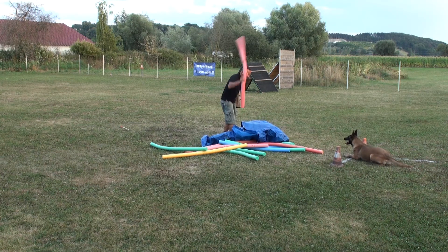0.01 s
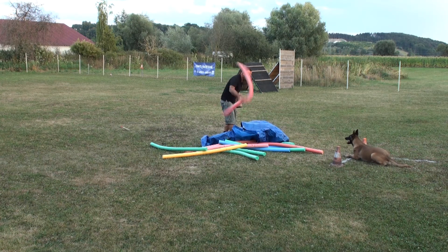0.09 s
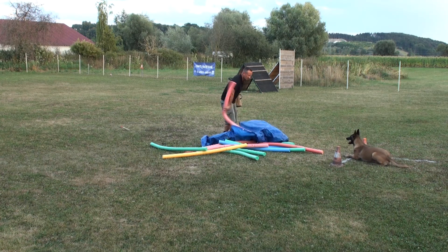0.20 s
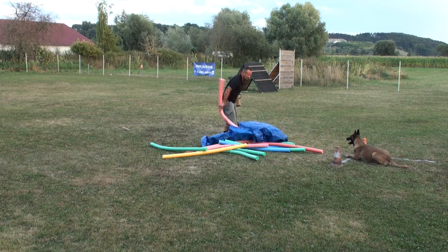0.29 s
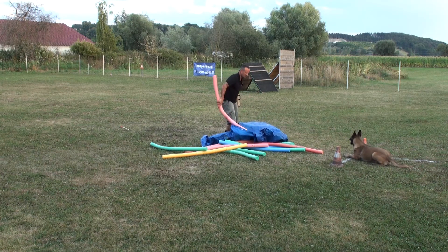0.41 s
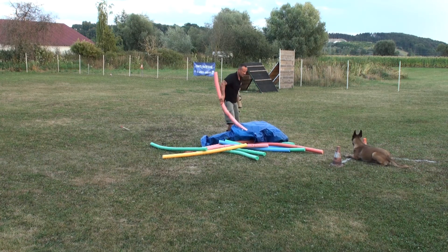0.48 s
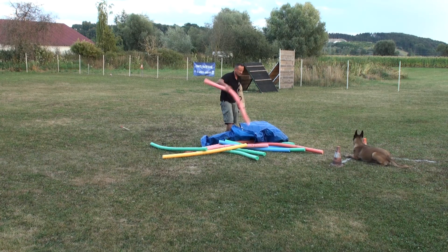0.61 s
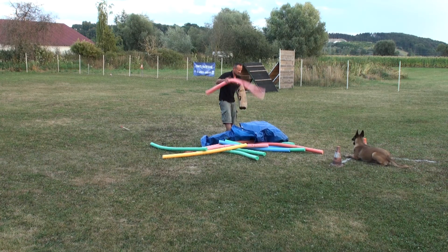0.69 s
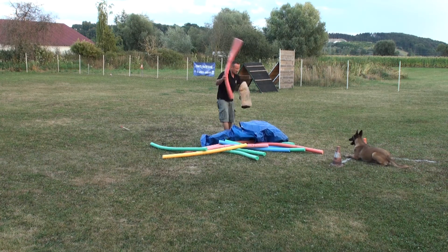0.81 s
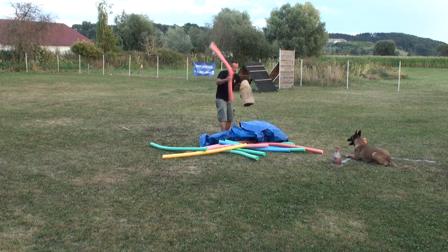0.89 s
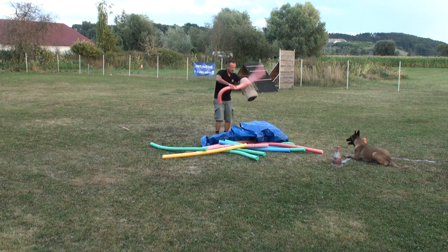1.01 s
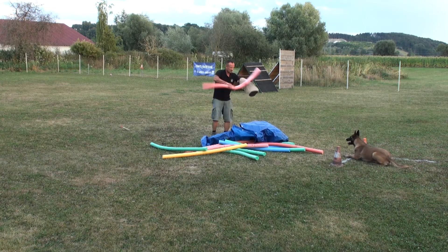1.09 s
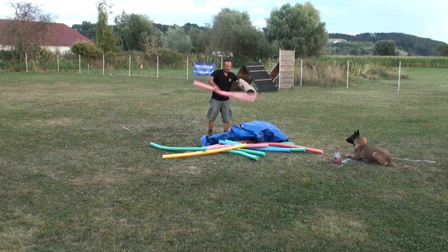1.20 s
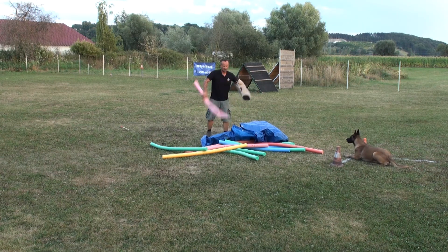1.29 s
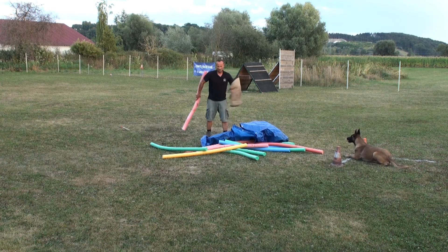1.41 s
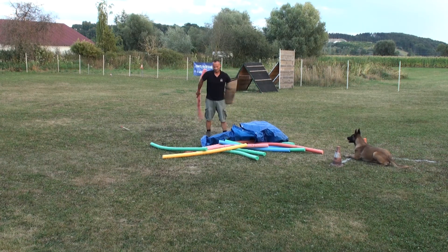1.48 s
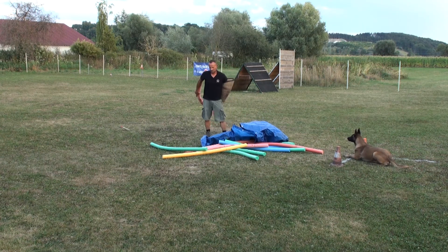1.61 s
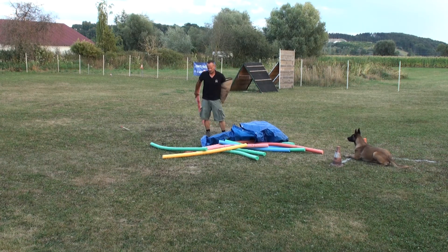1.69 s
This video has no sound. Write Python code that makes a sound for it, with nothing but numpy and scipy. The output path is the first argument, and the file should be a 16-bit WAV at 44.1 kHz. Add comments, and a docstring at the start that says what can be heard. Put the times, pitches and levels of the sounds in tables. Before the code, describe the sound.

A foam pool noodle slaps sharply onto a plastic tarp outdoors, then a softer hollow knock follows

```python
"""The open-air hush is heard first; then a foam noodle swishes and slaps a plastic tarp on a grass field.
The slap is a burst of tiny snaps, a low thump and a dying crinkle. Later the noodle knocks softly
against a padded sleeve: a falling pop, ringing noise and a rub. Ticks and taps are short noise and
tones, a far bird is gliding whistles, and the hush is coloured noise with a low, wavering drone."""
import sys
import numpy as np
from scipy import signal
from scipy.io import wavfile
from scipy.ndimage import uniform_filter1d

SR = 44100
rng = np.random.default_rng(int(sys.argv[2]) if len(sys.argv) > 2 else 0)


def gain_from_decibels(decibels):
    """Convert decibel values to linear amplitude factors."""
    exponent = np.asarray(decibels, float) / 20
    return 10 ** exponent


def output_pcm(signal):
    """Save a mono or channel-first signal as 16-bit PCM at the path in sys.argv[1].

    Samples are clipped to [-1, 1] before scaling.
    """
    pcm = np.clip(np.atleast_2d(signal).T, -1, 1) * 32767
    wavfile.write(sys.argv[1], SR, np.round(pcm).astype(np.int16))


N = 77175  # length of the scene [samples]

# Levels are those before fades, swells and reflections.
# Tone colour of the noodle hitting the tarp: (frequency [Hz], relative level per hertz [dB])
SLAP_COLOUR = [(150, -40), (250, -9), (411, -10), (1020, -2), (1590, -3), (1990, 3), (3680, -13),
               (4370, -1), (5650, -19), (6260, -12.5), (10800, -18.5), (15000, -39)]
# Tone colour of the tarp settling: (frequency [Hz], relative level per hertz [dB])
CRINKLE_COLOUR = [(150, -40), (250, -10), (318, -6.5), (675, -8), (904, 0.5), (1170, -3.5), (2530, -4),
                  (10800, -20), (15000, -38)]
# Air ringing under the tarp: (frequency [Hz], level [dB], time to fall 60 dB [s])
THUMP_MODES = [(75, -65, .1), (149.7, -36, 0.088), (240, -47.5, .12)]
# Rumble of the noodle's body: (frequency [Hz], level [dB], time to fall 60 dB [s])
KNOCK_BODY_MODES = [(147, -41.5, 0.063), (237, -36.5, 0.093), (690, -38.5, 0.11), (1090, -43, 0.091),
                    (2440, -26.5, 0.013)]
# Foam sliding on cloth: (start [s], length [s], level [dB])
RUB_TIMES = [(1.084, 0.038, -47), (1.135, .03, -50.5)]
# Tone colour of foam on cloth: (frequency [Hz], relative level per hertz [dB])
RUB_COLOUR = [(710, -30), (1200, 1), (1990, -13), (2600, -7), (2980, -19), (7960, 2), (15000, -21)]
# Bright snaps of plastic: (time [s], approximate peak level [dB], centre frequency [Hz], nominal length [s])
PLASTIC_TICKS = [(0.439, -46, 3500, 0.0054), (0.49, -46, 6500, 0.0028), (0.578, -56, 4500, .003),
                 (0.68, -56, 7500, 0.0034), (.8088, -50.5, 3440, .008), (1.0078, -46, 5450, 0.0038),
                 (1.2745, -37.5, 6360, 0.0029)]
# Dull taps: (time [s], level [dB], frequency [Hz])
DULL_TAPS = [(1.0098, -43.5, 705), (1.275, -43.5, 503), (1.316, -50, 402), (1.445, -46, 650)]
# Bird whistles: (start [s], length [s], first frequency [Hz], last frequency [Hz], level before panning [dB])
BIRD_CHIRPS = [(0.513, 0.026, 2990, 4300, -67), (0.542, 0.013, 4330, 4000, -63),
               (.562, 0.028, 3590, 3290, -64), (.592, 0.0235, 2400, 1880, -57.5),
               (0.634, .025, 2860, 2650, -64), (.688, .022, 4100, 3320, -62.5),
               (0.71, 0.047, 3400, 2950, -61), (1.018, 0.0247, 4420, 3810, -63),
               (1.048, 0.019, 3280, 3670, -61), (1.555, 0.033, 4200, 3820, -64.5),
               (1.593, 0.041, 3500, 3100, -66)]
# Tone colour of the hush: (frequency [Hz], relative level per hertz [dB])
HUSH_COLOUR = [(15, -43), (25, -13), (188, -5.5), (260, -7.5), (289, -2.5), (389, -12.5), (509, -10),
               (598, -13), (741, -12), (1020, -12), (4040, -22.5), (15500, -34.5)]
# How alike the hush is in both ears: (frequency [Hz], left-right likeness [1 = the same])
HUSH_LIKENESS = [(60, 1), (180, 0.99), (550, 0.54), (1650, 0.15), (4970, 0.19), (15000, 0.79)]


def evened(x):
    """Scales a sound to an average (rms) strength of 1."""
    return x / np.sqrt(np.mean(x ** 2) + 1e-20)


def read(points, hz):
    """Reads a table between its points, with frequency on a log scale."""
    f, value = np.transpose(points)
    return np.interp(np.log(hz + 1), np.log(f + 1), value)


def add(mix, s, sound):
    """Mixes a sound in at a time in seconds, cutting it at the end of the mix."""
    part = mix[round(s * SR):][:len(sound)]
    part += sound[:len(part)]


def fade(t, t60):
    """Holds at 1 before time zero, then falls 60 dB in each t60."""
    return 10 ** (-3 * np.maximum(t, 0) / t60)


def band(x, hz, width_hz):
    """Passes sound through a resonance whose gain is 1 at its centre."""
    return signal.lfilter(*signal.iirpeak(hz, hz / width_hz, SR), x)


def snaps(seconds, colour, per_s, cycles, spread_db, count=36):
    """Dense tiny snaps, each ringing a few cycles at one of many pitches; a few are large."""
    n = round(seconds * SR)
    out = np.zeros(n)
    for hz in np.geomspace(colour[1][0], colour[-2][0], count):
        u = np.arange(int(3 * cycles * SR / hz)) * hz / SR  # time in cycles
        ringing = np.sin(2 * np.pi * u) * np.exp(-2 * u / cycles)
        draw = rng.random((n, 3))
        sign = np.sign(draw[:, 1] - 0.5)
        size = gain_from_decibels(-spread_db * np.log(draw[:, 0] + 0.0082)) * sign
        often = np.minimum(per_s / count * np.sqrt(hz / 2000), SR / 2)  # higher pitches snap more often
        hits = size * (draw[:, 2] < often / SR) / np.sqrt(often)
        train = signal.oaconvolve(hits, ringing / np.linalg.norm(ringing))[:n]
        out += gain_from_decibels(read(colour, hz)) * np.sqrt(hz) * train
    return evened(out)


def dying_modes(modes, rise_s):
    """Adds tones that start softly and then die away, each at its own rate."""
    t = np.arange(SR // 2) / SR
    total = sum(gain_from_decibels(db) * np.sin(2 * np.pi * hz * t) * fade(t - rise_s, t60) for hz, db, t60 in modes)
    return total * np.minimum(t / rise_s, 1)


def slap():
    """The swing pushes low air, the foam rolls down in a flat-topped burst, then the tarp settles."""
    slap_s, roll_s, swish_s = 0.2472, 0.018, 0.04
    out = np.zeros(N)
    t = np.arange(round(0.6 * SR)) / SR
    after_roll = t - roll_s

    burst = snaps(0.6, SLAP_COLOUR, per_s=30000, cycles=4.03, spread_db=2)
    burst *= gain_from_decibels(-21.5) * fade(after_roll, 0.03)
    # The crinkle dies quickly at first, leaving a faint slow tail.
    settle = gain_from_decibels(-29.5) * fade(after_roll, 0.15) + gain_from_decibels(-46.5) * fade(after_roll, 0.74)
    tarp = snaps(0.6, CRINKLE_COLOUR, per_s=12000, cycles=3.14, spread_db=3.5) * settle
    add(out, slap_s, (burst + tarp) * np.minimum(t / 0.00025, 1))
    add(out, slap_s, dying_modes(THUMP_MODES, rise_s=0.0099))

    u = np.linspace(0, 1, round(swish_s * SR))
    low_air = evened(band(rng.standard_normal(len(u)), 220, 270))
    add(out, slap_s - swish_s, gain_from_decibels(-51) * u ** 2 * low_air)
    return out


def knock():
    """The hollow noodle pops with a few falling cycles, its body rumbles on, and the foam rubs past."""
    knock_s, length_s, from_hz, toward_hz = 1.1039, 0.0045, 1300, 534
    out = np.zeros(N)
    u = np.linspace(0, 1, round(length_s * SR))
    pop_hz = toward_hz + (from_hz - toward_hz) * np.exp(-3.5 * u)
    swell = np.sin(np.pi * u ** 0.61) ** 0.72
    add(out, knock_s, gain_from_decibels(-24) * swell * np.sin(2 * np.pi * np.cumsum(pop_hz) / SR))

    t = np.arange(SR // 4) / SR
    for hz, db, t60 in KNOCK_BODY_MODES:
        body = evened(band(rng.standard_normal(len(t)), hz, 0.14 * hz))
        add(out, knock_s, gain_from_decibels(db) * body * fade(t, t60) * np.minimum(t / 0.0029, 1))

    for start, length, db in RUB_TIMES:
        hiss = snaps(length, RUB_COLOUR, per_s=40000, cycles=1.24, spread_db=3.2)
        swell = np.sin(np.pi * np.linspace(0, 1, len(hiss)) ** 1.35)
        add(out, start, gain_from_decibels(db) * hiss * swell)
    return out


def ticks():
    """Plastic snaps are brief bands of noise; dull taps are tones that die in a few cycles."""
    out = np.zeros(N)
    t = np.arange(900) / SR
    for s, db, hz, length in PLASTIC_TICKS:
        snap = evened(band(rng.standard_normal(len(t)), hz, 0.76 * hz))
        # Noise peaks stand about 8.5 dB above its average strength.
        add(out, s, gain_from_decibels(db - 8.5) * snap * fade(t - length / 2, 3.0 * length))
    for s, db, hz in DULL_TAPS:
        add(out, s, gain_from_decibels(db) * np.sin(2 * np.pi * hz * t) * fade(t * hz, 6.5))  # 60 dB down in 6.5 cycles
    return out


def bird():
    """Short gliding whistles with a slight warble, blurred by distance and louder on the left."""
    warble_hz, warble_depth, left_over_right_db = 69.4, 0.031, 8.5  # depth as a share of the pitch
    out = np.zeros(N)
    for start, length, from_hz, to_hz, db in BIRD_CHIRPS:
        u = np.linspace(0, 1, round(length * SR))
        glide = from_hz + (to_hz - from_hz) * u
        hz = glide * (1 + warble_depth * np.sin(2 * np.pi * warble_hz * length * u))
        blur = 1 + 0.52 * evened(uniform_filter1d(rng.standard_normal(len(u)), 60))
        swell = np.sin(np.pi * u) ** 0.51
        add(out, start, gain_from_decibels(db) * swell * blur * np.sin(2 * np.pi * np.cumsum(hz) / SR))
    return out * gain_from_decibels(np.array([[left_over_right_db], [-left_over_right_db]]) / 2)


def hush():
    """Far traffic, leaves and microphone hiss as drifting random spectra, with a far engine's drone."""
    frames, hz = N // 256 + 5, np.fft.rfftfreq(1024, 1 / SR)
    a, b, c, d, patches = rng.standard_normal((frames, 513, 5)).T
    # Smoothing over frequency, then time, makes patches that drift in level.
    patches = evened(uniform_filter1d(uniform_filter1d(patches, 10, 0), 12, 1))
    same = np.clip(read(HUSH_LIKENESS, hz), -1, 1)[:, None]
    left = a + 1j * b
    right = same * left + np.sqrt(1 - same ** 2) * (c + 1j * d)
    spectra = np.array([left, right]) * gain_from_decibels(read(HUSH_COLOUR, hz)[:, None] + 1.3 * patches)
    air = signal.istft(spectra, nperseg=1024, noverlap=768)[1][:, :N]

    # Noise passed twice through a narrow resonance wavers like a far engine.
    drone = rng.standard_normal(N)
    for _ in range(2):
        drone = band(drone, 281.7, 21.4)
    return gain_from_decibels(-57) * evened(air) + gain_from_decibels(-69) * evened(drone)


def field(x):
    """Close ground reflections that differ left and right, and dull scatter from fence and trees."""
    t = np.arange(SR // 2) / SR
    near = rng.standard_normal(120) * fade(t[:120], 0.0032)
    side = gain_from_decibels(-15) * signal.oaconvolve(x, near / np.linalg.norm(near))[:N]
    taps = rng.standard_normal((2, len(t))) * fade(t, 0.3) * np.minimum(t / 0.018, 1)
    taps = signal.lfilter([1], [1, -0.6], taps)  # dulls the scatter
    far = signal.fftconvolve(x[None], taps / np.linalg.norm(taps[0]), axes=1)[:, :N]
    return np.array([x + side, x - side]) + gain_from_decibels(-22) * far


def scene():
    """Places the near sounds in the field, over the bird and hush."""
    return field(slap() + knock() + ticks()) + bird() + hush()


def top_cut(x):
    """Nothing passes above the cut-off."""
    return signal.sosfilt(signal.butter(12, 16440, fs=SR, output="sos"), x)


def record(dry):
    """Takes away the treble above about 15.8 kHz and finishes the mix."""
    edge = signal.firwin(255, 15800, window=("kaiser", 9), fs=SR)[None]
    finished = signal.oaconvolve(dry, edge, "same")
    return top_cut(finished)


dry = scene()
out = record(dry)
output_pcm(out)
```